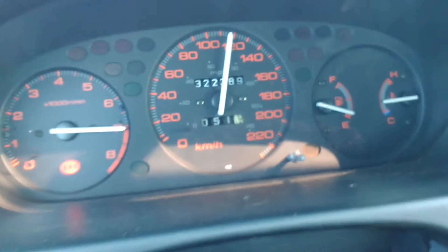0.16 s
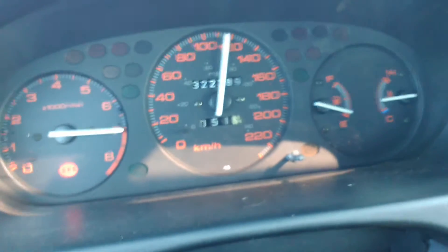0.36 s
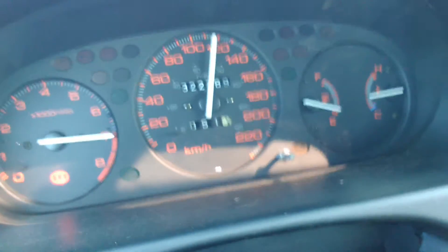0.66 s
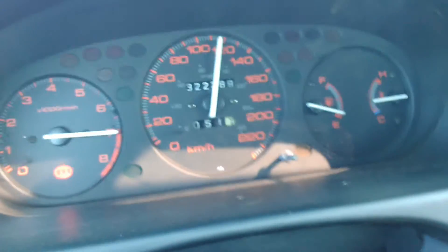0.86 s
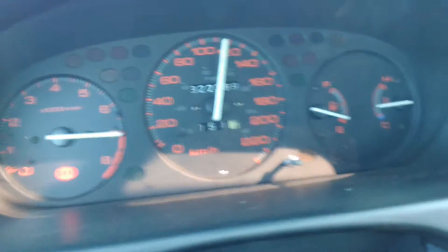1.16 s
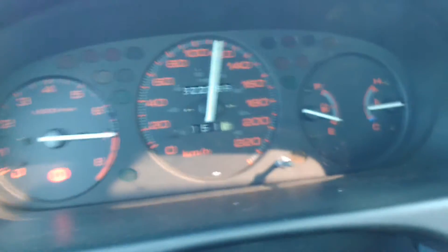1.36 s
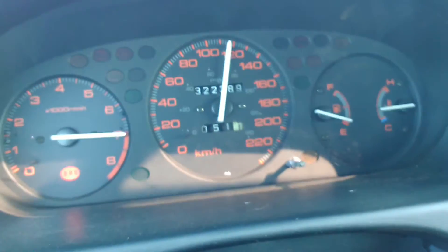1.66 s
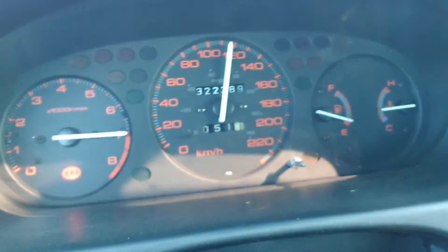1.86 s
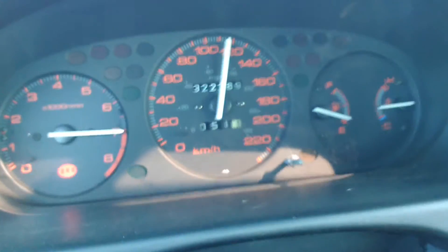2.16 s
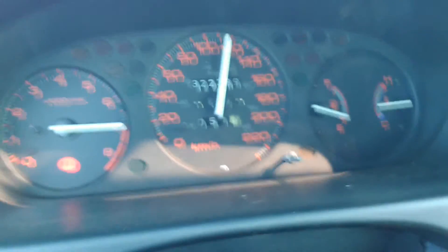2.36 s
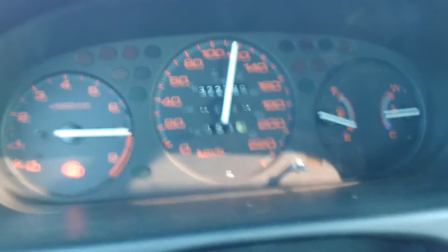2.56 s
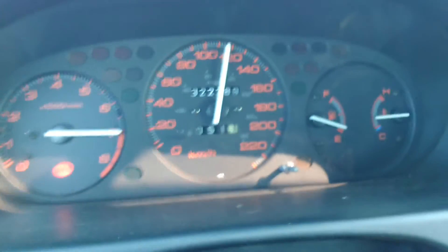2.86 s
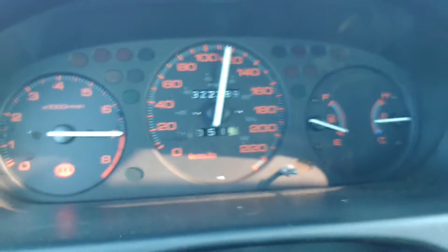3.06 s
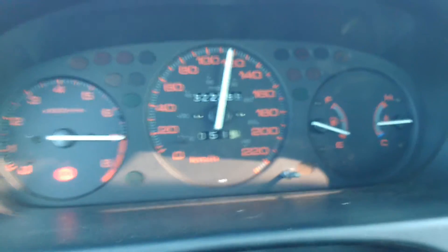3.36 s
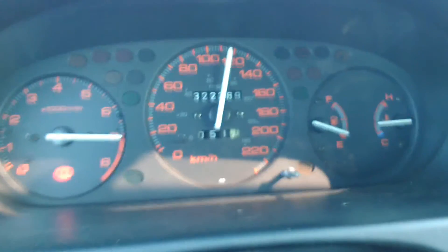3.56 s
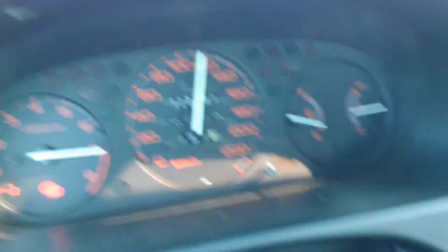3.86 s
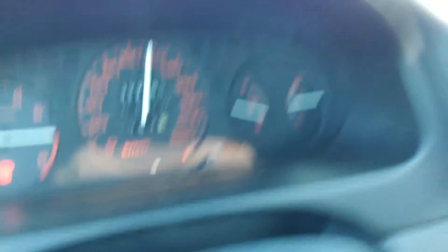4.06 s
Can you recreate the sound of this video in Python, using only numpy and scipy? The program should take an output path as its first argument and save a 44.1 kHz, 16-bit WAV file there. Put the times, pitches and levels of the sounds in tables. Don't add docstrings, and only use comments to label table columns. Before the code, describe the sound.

From 0 to about 4 seconds, a four-cylinder car engine with an open intake is held against its rev limiter, heard inside the cabin. The loud, buzzing harmonic tone has its main firing pitch around 220 to 234 Hz, with strong overtones. Roughly every 0.16 seconds the fuel cuts: a dull thump near 185 Hz, then about 0.08 to 0.12 seconds of falling pitch with more intake hiss and dry valve clatter. Fuel relights with a weaker thump and the pitch climbs to the next cut. Spacing is slightly uneven, with longer coasts around 0.3 to 0.75 seconds and again near 1.5 to 1.9. Tone colour flips between hollow and full as panels resonate. Constant road and wind roar, low boom and very faint belt whistles sit beneath. Close, dry cabin reflections; small microphone, thin bass, gently flattened peaks. The stutter continues to the end without slowing.

```python
import sys
import numpy as np
from scipy import signal
from scipy.fft import rfft, irfft
from scipy.io import wavfile
from scipy.ndimage import uniform_filter1d

SR = 44100
rng = np.random.default_rng(int(sys.argv[2]) if len(sys.argv) > 2 else 0)


def int16_out(signal):
    q = np.round(np.clip(np.atleast_2d(signal).T, -1, 1) * 32767)
    wavfile.write(sys.argv[1], SR, q.astype(np.int16))


def attenuation_scalar(level_db):
    decades = np.asarray(level_db, float) / 20
    return 10 ** decades


N = 185967
STEP = 88


def evened(x):
    return x / np.sqrt(np.mean(abs(x) ** 2) + 1e-20)


def smooth(x, seconds):
    n = max(int(seconds * SR), 1)
    once = uniform_filter1d(x, n, mode="nearest")
    return uniform_filter1d(once, n, mode="nearest")


def drift(hz):
    pole = np.exp(-2 * np.pi * hz / 500)
    wander = signal.lfilter([1], [1, -pole], rng.standard_normal(N // STEP + 2))
    return evened(wander)[np.arange(N) // STEP]


def resonate(x, hz, width_hz):
    r = np.exp(-np.pi * width_hz / SR)
    return signal.lfilter([1 - r], [1, -r * np.exp(2j * np.pi * hz / SR)], x)


def read(points, hz):
    f, value = np.transpose(points)
    return np.interp(np.log(hz + 1), np.log(f + 1), value)


def blend(fuel, coast_db, fire_db):
    return attenuation_scalar(coast_db) * (1 - fuel) + attenuation_scalar(fire_db) * fuel


def switches():
    # fuel cut in seconds, coasting until relight in seconds.
    bounces = [(-.01, .081), (.147, .082), (.298, .104), (.463, .119), (.641, .1), (.818, .081),
               (.977, .08), (1.135, .079), (1.295, .088), (1.451, .099), (1.62, .089), (1.776, .101),
               (1.956, .079), (2.12, .074), (2.282, .088), (2.45, .097), (2.624, .086), (2.785, .08),
               (2.944, .069), (3.091, .082), (3.242, .08), (3.391, .082), (3.552, .08), (3.7, .088),
               (3.859, .089), (4.019, .08), (4.177, .083)]
    cut_s, coast_s = np.transpose(bounces)
    return np.ravel(np.c_[cut_s, cut_s + coast_s])


def limiter():
    cut_hz, relight_hz = 233.6, 220.5
    overshoot_hz_per_s = 40
    lead_s = .014
    switch_s = switches()
    burn_s = switch_s[2::2] - switch_s[1:-1:2]
    turn_hz = np.resize([cut_hz, relight_hz], len(switch_s))
    turn_hz[2::2] += overshoot_hz_per_s * (burn_s - burn_s.mean())
    t = np.arange(N) / SR + lead_s
    rate_hz = smooth(np.interp(t, switch_s, turn_hz), .012)
    fuel = (np.searchsorted(switch_s, t) + 1) % 2 * 1.
    return np.cumsum(rate_hz) / SR, fuel


def through_panel(turns, drive, hz, width_hz, dip_hz):
    beat = np.exp(2j * np.pi * (turns - hz * np.arange(len(turns)) * STEP / SR))
    r = np.exp(-np.pi * width_hz * STEP / SR)
    ringing = signal.lfilter([1 - r], [1, -r], drive * beat) / beat
    return ringing - 0.87 * drive / (1 + 2j * (dip_hz - hz) / width_hz)


def orders(firings, fuel):
    # multiple of the firing rate, level in dB,
    # panel resonance in Hz, its width in Hz, dip in Hz.
    coasting_orders = [(1, -18.5, 234.4, 13, 234.3), (1.5, -22, 363.0, 29, 360.9),
                       (2, -11.5, 456.9, 24.2, 462.7), (3, -16, 700.4, 21.6, 700.4),
                       (3.5, -19.5, 799.1, 68, 795.2), (4, -14.0, 925.7, 16.2, 803),
                       (5, -19.5, 1138.0, 11.3, 1000.0), (6, -22.5, 1300, 89, 1303),
                       (7, -30, 1580.9, 16, 1574.4), (8, -23, 1715.8, 41, 1740.0),
                       (8.5, -26, 1934.6, 28.0, 1900.1), (9, -27, 1973.1, 46, 2036.3),
                       (9.5, -37, 2079.6, 33, 2101.4), (10, -30, 2227.1, 9, 2233.7),
                       (10.5, -37, 2397.8, 44, 6900), (11, -34.5, 2554.3, 15, 2628.0),
                       (11.5, -35.5, 2580.9, 13, 2497.1), (12, -31, 2720.0, 66, 1200),
                       (12.5, -31.5, 2827.9, 29, 2919.5), (13, -40.5, 2959.0, 220, 2788.9),
                       (13.5, -35, 3061.4, 51.7, 2300), (14, -36, 3212.2, 39, 3238.3),
                       (15, -40, 1600, 120, 3290.8), (16, -40, 3627.5, 13, 3621.1)]
    # multiple of the firing rate, level in dB,
    # panel resonance in Hz, its width in Hz, dip in Hz.
    firing_orders = [(1, -10, 218.6, 39.3, 218), (1.5, -26.5, 362.1, 14, 369.4),
                     (2, -12, 450.7, 22.5, 462.2), (3, -16, 704.7, 47, 697.8),
                     (3.5, -14, 812.0, 133, 806.9), (4, -20.5, 907.9, 86, 800.0),
                     (5, -15.5, 1132.3, 110, 1135.6), (6, -30.5, 1335.5, 14, 1332.8),
                     (7, -25.9, 1484.0, 130, 1539.7), (8, -21.5, 1869.3, 8.4, 1931.6),
                     (8.5, -30, 1936.0, 9.5, 1919.4), (9, -41.5, 1995.1, 20.6, 1979.4),
                     (9.5, -38, 2205.2, 33, 2223.9), (10, -37, 1900, 59, 2214.5),
                     (10.5, -34.5, 2347.8, 98, 2393.8), (11, -40.5, 2532.2, 47, 2519.5),
                     (11.5, -37, 2675.6, 47, 2656.7), (12, -47, 2703.3, 57, 2722.5),
                     (12.5, -44.4, 2837.1, 28.1, 2846.3), (13, -42.5, 1900, 38, 4000),
                     (13.5, -39, 8000, 98.6, 3053.6), (15, -51.5, 3345.7, 4.9, 3700)]
    # multiple of the firing rate, coasting level in dB,
    # firing level in dB, build-up delay in seconds.
    uneven_orders = [(.5, -40, -37.5, 0.029), (1.25, -52, -29.5, 0.038), (1.75, -33, -30.5, 0),
                     (2.25, -57, -28.5, .03), (2.5, -30.5, -35.5, 0.014), (2.75, -29.5, -30, 0.015),
                     (3.25, -37.5, -53, 0.011), (3.75, -45.5, -31, 0.018), (4.5, -41, -40, 0),
                     (4.75, -31.5, -33, 0.0092), (5.25, -36, -38, 0), (5.5, -42, -32.5, 0.055),
                     (6.5, -45, -38.5, 0.033), (12.25, -39, -53, .001)]
    out = np.zeros(N)
    lit = smooth(fuel, .006)
    slow_firings, slow_lit = firings[::STEP], lit[::STEP]
    envelopes = {}
    for table, gate in (coasting_orders, 1 - slow_lit), (firing_orders, slow_lit):
        for k, db, *panel in table:
            path = through_panel(k * slow_firings, attenuation_scalar(db) * gate, *panel)
            envelopes[k] = envelopes.get(k, 0) + path

    steps = np.arange(N) / STEP
    for k, envelope in envelopes.items():
        shaky = attenuation_scalar(1.43 * smooth(drift(13), 0.0019)) * np.exp(.03j * k * smooth(drift(25), .004))
        tone = shaky * np.exp(2j * np.pi * (k * firings + rng.random()))
        full = np.interp(steps, np.arange(len(slow_firings)), envelope)
        out += np.sqrt(2) * (full * tone).real

    for k, coast_db, fire_db, delay_s in uneven_orders:
        settled = np.roll(smooth(lit, 0.018), int(delay_s * SR))
        shaky = evened(1.2 + smooth(drift(19), .004) + 1j * smooth(drift(27), 0.0016))
        tone = shaky * np.exp(2j * np.pi * k * firings)
        out += np.sqrt(2) * (blend(settled, coast_db, fire_db) * tone).real
    return out


def thumps(firings):
    ring_hz, rise_s, fall_s = 185.1, 0.0098, 0.0063
    level_db, spread_db = (-12.5, -17.3), 1.2
    ahead_turns = 0.5, 0.76
    out, t = np.zeros(N), np.arange(N) / SR
    for n, s in enumerate(switches()):
        near = slice(max(int((s - .06) * SR), 0), int((s + .06) * SR))
        u = t[near] - s
        db = level_db[n % 2] + spread_db * rng.standard_normal()
        turns = np.interp(s, t, firings) + ahead_turns[n % 2]
        turns = turns + ring_hz * (u - 2 * u ** 2)
        swell = np.exp(-.5 * ((u - .004) / np.where(u < .004, rise_s, fall_s)) ** 2)
        out[near] += attenuation_scalar(db) * swell * np.cos(2 * np.pi * turns)
    return out


def valves(firings, coasting):
    cam_pattern_db = [2.5, -10, -2.5, -9]
    # frequency in Hz, width in Hz, level in dB.
    cover_modes = [(2234, 13, -4.5), (2593, 66, 9), (2672, 64, -3.5), (2968, 230, -2), (3398, 40, -7.5),
                   (3950, 150, -1.5), (5220, 33, -28), (5430, 71, -13.5), (5870, 65, -12.5),
                   (6140, 38, -17)]
    at = np.flatnonzero(np.diff(np.floor(firings)))
    late, uneven = rng.standard_normal((len(at), 2)).T
    strength = attenuation_scalar(np.resize(cam_pattern_db, len(at)) + 3.4 * uneven)
    knocks = np.zeros(N)
    at = np.clip(at + np.round(1.2 * late).astype(int), 0, N - 1)
    np.add.at(knocks, at, strength)
    ring = np.zeros(N)
    for hz, width_hz, db in cover_modes:
        ring += attenuation_scalar(db) / np.sqrt(width_hz) * resonate(knocks, hz, 0.37 * width_hz).real
    ring = signal.sosfilt(signal.butter(4, [1900, 4200], "band", fs=SR, output="sos"), ring)
    return evened(ring) * blend(1 - coasting, coast_db=-32, fire_db=-38)


def roar(firings, coasting):
    # frequency in Hz, density in dB per Hz.
    roar_spectrum = [(25, -29), (60, -24), (120, -1), (560, -3), (1000, -5.5), (1700, -4.5), (2400, -12.5),
                     (3700, -13), (4400, -22), (5300, -20.5), (6300, -26), (7200, -31), (11000, -36.5),
                     (13000, -43), (15500, -49.5)]
    # frequency in Hz, lift in dB.
    coast_lift = [(100, 0), (800, -7), (2000, 2.5), (4000, 3), (7000, 9.5), (12000, 6)]
    frames, hz = N // 128 + 5, np.fft.rfftfreq(512, 1 / SR)
    a, b, patches = rng.standard_normal((frames, 257, 3)).T
    patches = evened(uniform_filter1d(uniform_filter1d(patches, 5, 0), 12, 1))
    at = np.minimum(np.arange(frames) * 128, N - 1)
    state = (coasting + .12 * smooth(drift(8.7), .01))[at] - .5
    z = (a + 1j * b) * attenuation_scalar(0.67 * patches + read(coast_lift, hz)[:, None] * state)
    white = signal.istft(z, nperseg=512, noverlap=384)[1][:N]
    white *= 1 + .12 * np.cos(2 * np.pi * firings)
    shape = attenuation_scalar(read(roar_spectrum, np.fft.rfftfreq(N, 1 / SR)))
    return attenuation_scalar(-23.5) * evened(irfft(rfft(white) * shape, N))


def whistles():
    # frequency in Hz, width in Hz, level in dB.
    bands = [(198, 32, -28), (5250, 170, -60.5), (6080, 120, -54.5), (14200, 90, -80)]
    out = np.zeros(N)
    for hz, width_hz, db in bands:
        gain = attenuation_scalar(db + 2.1 * np.tanh(smooth(drift(6.2), 0.011)))
        once = resonate(rng.standard_normal(N), hz, width_hz)
        out += gain * evened(resonate(once, hz, width_hz).real)
    return out


def cabin(x):
    t60_s, echo_db = .06, -9
    t = np.arange(3000) / SR
    hits = rng.choice([-1., 1.], len(t)) * (rng.random(len(t)) < .03)
    taps = hits * attenuation_scalar(-60 * t / t60_s)
    echoes = signal.oaconvolve(x, taps / np.linalg.norm(taps))[:N]
    return evened(x + attenuation_scalar(echo_db) * echoes) * x.std()


def scene():
    swell_delay_s, swell_s = .019, .022
    firings, fuel = limiter()
    delayed = np.r_[np.full(int(swell_delay_s * SR), .6), 1 - fuel][:N]
    coasting = smooth(delayed, swell_s)
    noisy = valves(firings, coasting) + roar(firings, coasting) + whistles()
    return (orders(firings, fuel) + cabin(noisy) + thumps(firings))[None]


def roll_off(x):
    return signal.sosfilt(signal.butter(12, 15720, fs=SR, output="sos"), x)


def record(dry):
    ceiling = 0.8
    rounded = dry / (1 + abs(dry / ceiling) ** 4) ** (1 / 4)
    thin = signal.sosfilt(signal.butter(2, 50, "high", fs=SR, output="sos"), rounded)
    return roll_off(thin)


dry = scene()
out = record(dry)
int16_out(out)
```